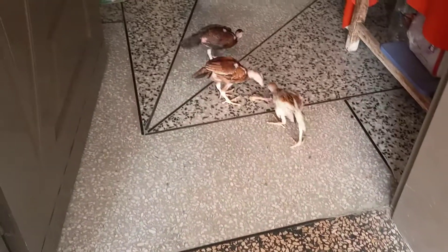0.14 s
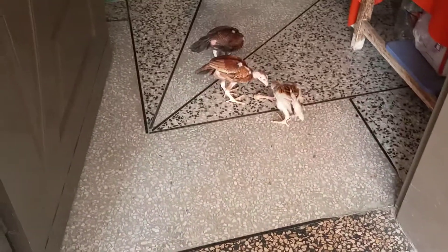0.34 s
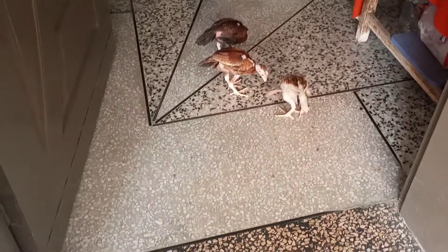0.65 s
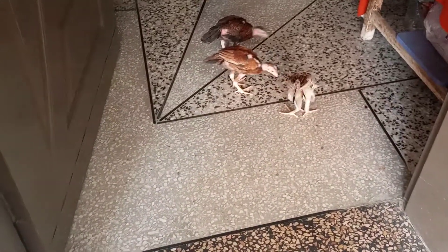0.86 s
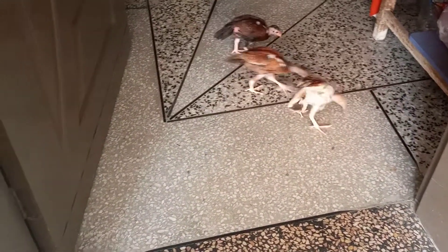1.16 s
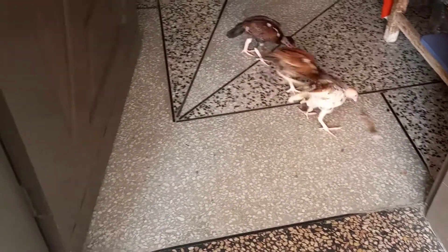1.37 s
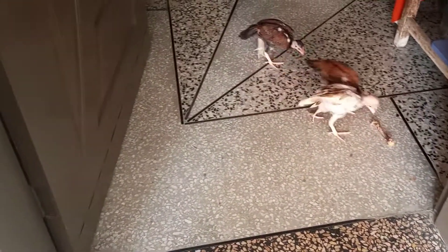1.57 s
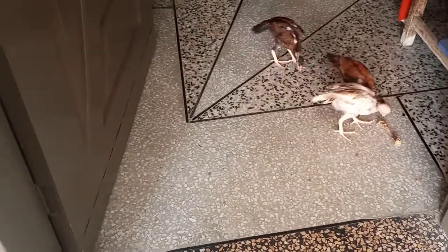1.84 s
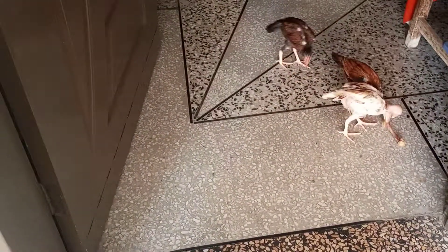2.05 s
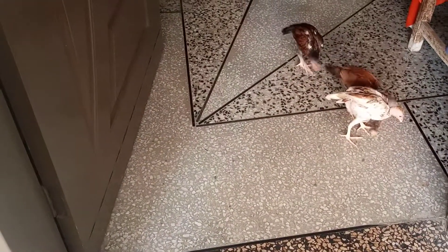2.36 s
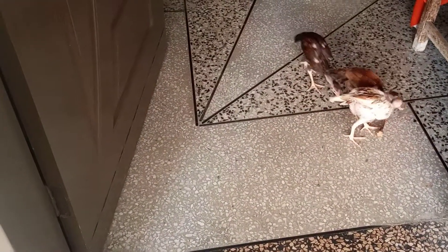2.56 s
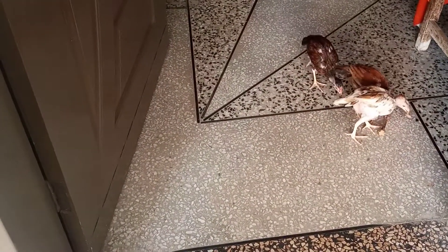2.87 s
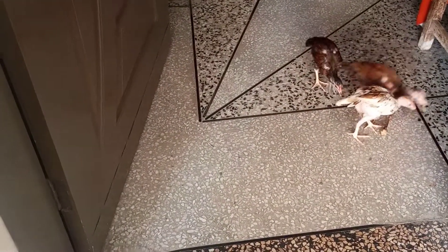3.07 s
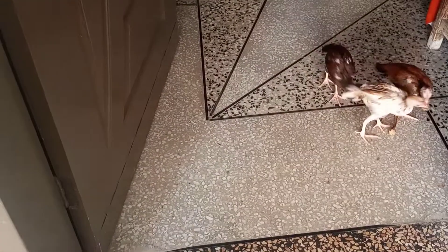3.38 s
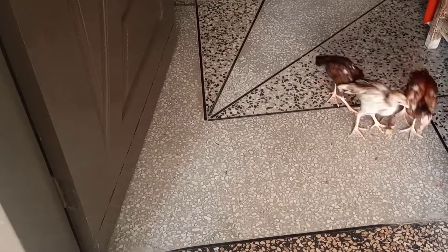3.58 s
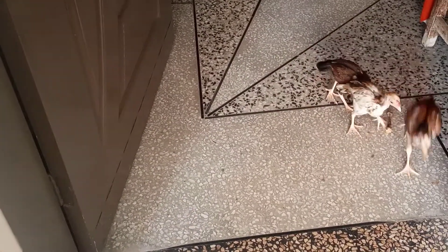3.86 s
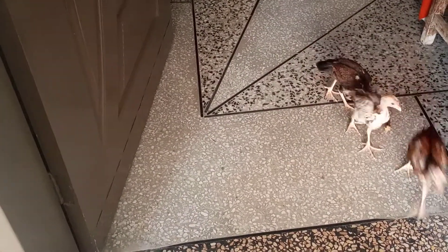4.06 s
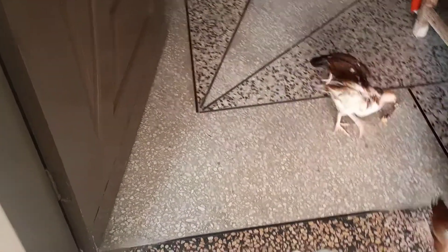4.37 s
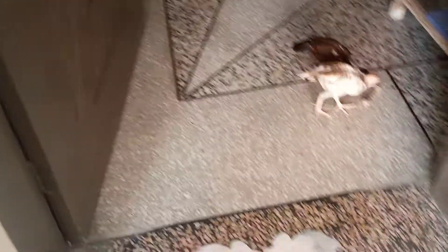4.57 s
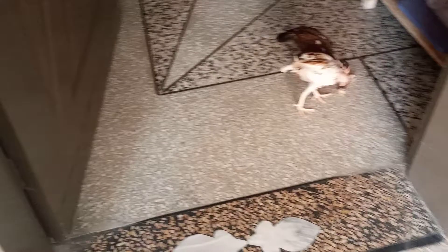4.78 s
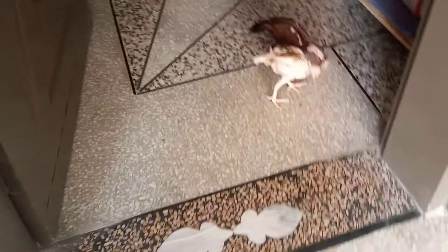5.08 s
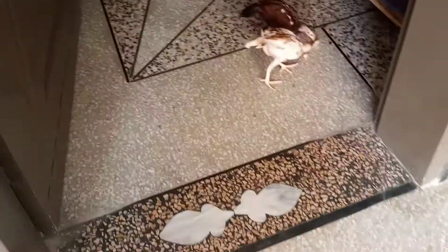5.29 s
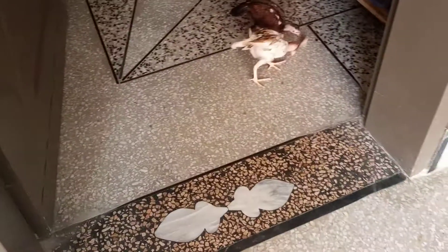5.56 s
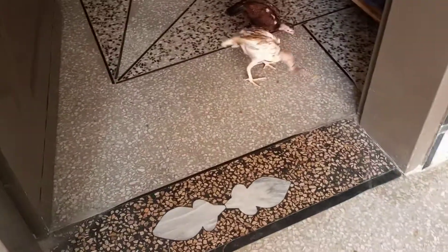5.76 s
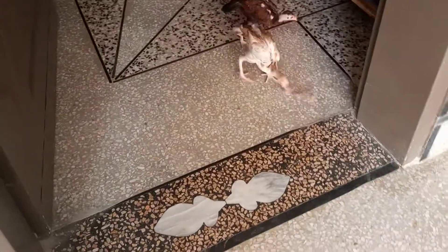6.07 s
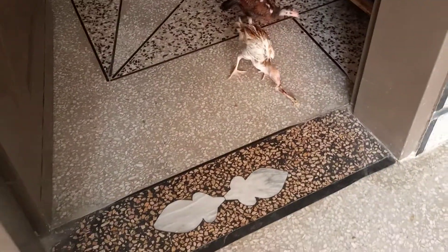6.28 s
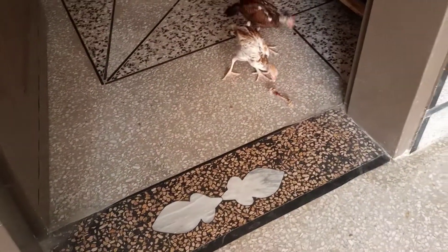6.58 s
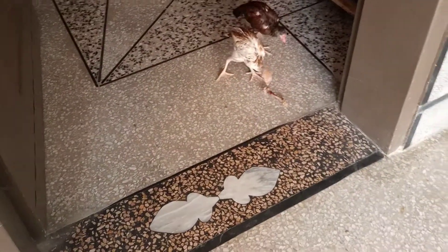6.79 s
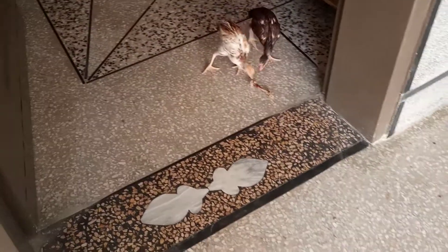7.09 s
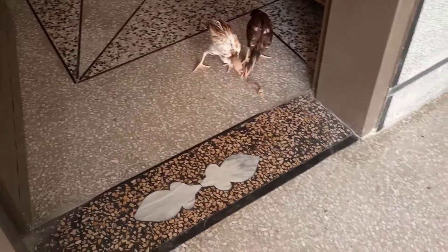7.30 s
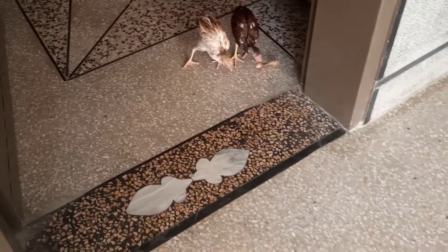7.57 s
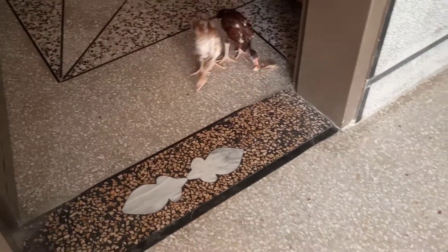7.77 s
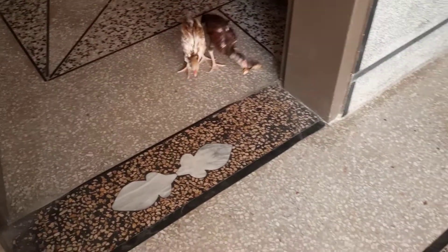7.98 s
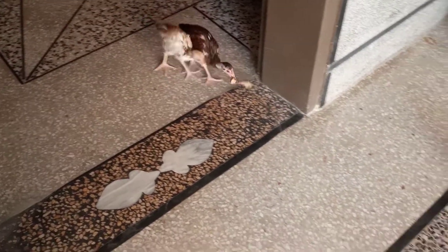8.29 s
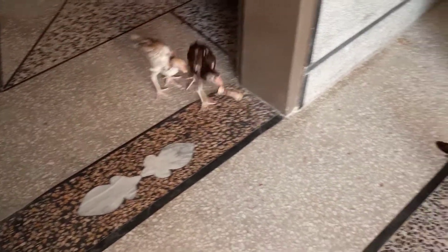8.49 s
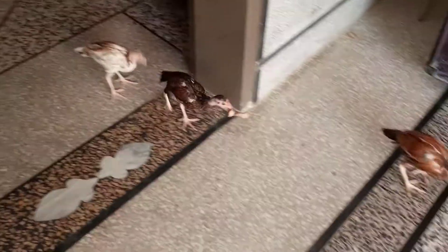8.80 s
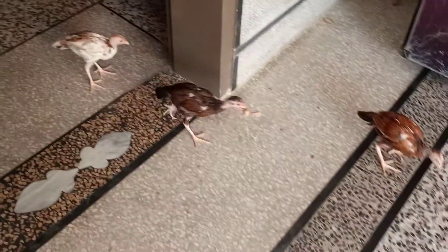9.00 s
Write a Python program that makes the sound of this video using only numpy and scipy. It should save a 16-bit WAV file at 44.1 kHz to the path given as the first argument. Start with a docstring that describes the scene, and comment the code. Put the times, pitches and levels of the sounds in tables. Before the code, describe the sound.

Three young chickens squabble indoors, thin whistled cheeps turning rough and loud near the end, with beak pecks and scuffs on hard stone.

```python
"""Three young chickens squabble over a scrap on the stone floor of a small, hard-walled hallway.
Each peep is an arched whistle from the two sides of the syrinx, which mix into sum and difference tones;
short cracks slide abruptly up or down in pitch, rough and rich in overtones. A thin squeak sounds once.
Beaks and claws tick, scuff and bump: shaped noise bursts. The hallway adds reflections and a diffuse tail.
Behind lie a low rumble, humming tones, dull air noise, a soft rush, dry rustles and a faint hiss."""
import sys
import numpy as np
from scipy import signal
from scipy.fft import rfft, irfft
from scipy.io import wavfile

SR = 44100
rng = np.random.default_rng(int(sys.argv[2]) if len(sys.argv) > 2 else 0)


def master_out(mix):
    """Clip the mix to full scale and print it as 16-bit PCM to the path in sys.argv[1]."""
    frames = np.transpose(np.atleast_2d(mix))
    ceiling = np.clip(frames, -1, 1)
    pcm = np.round(ceiling * 32767).astype(np.int16)
    wavfile.write(sys.argv[1], SR, pcm)


N = 403074
T = np.arange(N) / SR


def undb(db):
    """Decibels to gain."""
    return 10 ** (np.asarray(db) / 20)


def unit(x):
    """Scale to rms 1."""
    return x / np.sqrt(np.mean(x ** 2) + 1e-20)


def add(out, s, x):
    """Mix x in at time s."""
    i = max(int(s * SR), 0)
    out[i:i + len(x)] += x[:len(out) - i]


def colour(x, points):
    """Filter by a (frequency [Hz], gain [dB]) curve, falling 32 dB per octave beyond its ends."""
    hz, db = np.transpose(points)
    f = np.maximum(np.fft.rfftfreq(len(x), 1 / SR), 1)
    octaves_outside = np.abs(np.log2(f / np.clip(f, hz[0], hz[-1])))
    gain_db = np.interp(np.log(f), np.log(hz), db) - 32 * octaves_outside
    return irfft(rfft(x) * undb(gain_db), len(x))


def band(x, lo_hz, hi_hz):
    """Band-pass, kept below half the sample rate."""
    edges = [lo_hz, min(hi_hz, SR / 2 - 1)]
    return signal.sosfilt(signal.butter(2, edges, "band", fs=SR, output="sos"), x)


def walk(n, rate):
    """Random wander: straight lines between normal draws, rate draws a second."""
    place = np.arange(n) * rate / SR
    return np.interp(place, np.arange(n), rng.standard_normal(n))


def gate(t, length, rise, fall):
    """Smooth opening and closing."""
    opening = np.sin(np.pi / 2 * np.clip(t / rise, 0, 1)) ** 2
    closing = np.sin(np.pi / 2 * np.clip((length - t) / fall, 0, 1)) ** 2
    return opening * closing


def swell(s, length, attack, release, db):
    """Gain of a sound that rises at time s, holds and dies away."""
    return undb(db) * gate(T - s, length, attack, release)


def membrane(hz, waver, jitter):
    """Phase of a vibrating membrane: the pitch wavers slowly and jitters fast."""
    wander = waver * walk(len(hz), 107.0) + jitter * walk(len(hz), 1500)
    return 2 * np.pi * np.cumsum(hz * (1 + wander)) / SR


# colour of the turbulence at the valve of the syrinx: (frequency [Hz], relative gain [dB])
RASP_COLOUR = [(1700, -14.5), (3000, -7), (5000, 6.5), (6500, -6), (9000, 3), (12000, -1.5), (15500, -6)]


def turbulence(n):
    """Air hissing through the valve of the syrinx: coloured noise of rms 1."""
    return unit(colour(rng.standard_normal(n), RASP_COLOUR))


# a rough peep takes a moment to reach full strength: shortfall at roughness 1 [dB], time constant [s]
SOFT_START_DB, SOFT_START_S = 8, .012
# the second voice peaks later: its pitch ratio grows by this share over a call
SECOND_DRIFT = 0.0195
# the octave fades over a call [dB]; the third harmonic follows the octave: offset [dB], slope [dB per dB]
OCTAVE_FADE_DB, THIRD_DB, THIRD_SLOPE = 1, -13, 0.6
# bulge in mid-call [dB]; a swelling call saves its push for the end (power of time)
ARCH_DB, PUSH_POWER = 1.3, 3.1
# force brings out high overtones: reference level [dB], strength there [dB], growth [dB per dB]
FORCE_DB, SHRILL_DB, SHRILL_SLOPE = -41, -27.5, 0.21


def peep_pitch(u, first_hz, top_hz, last_hz, crest):
    """Arched pitch over the call's progress u: an early crest glides down, a late one holds, then drops."""
    rise = (first_hz - top_hz) * np.abs(1 - u / crest) ** 2.6
    fall = (last_hz - top_hz) * np.abs((u - crest) / (1 - crest)) ** (1.4 + 2.4 * crest)
    return top_hz + np.where(u < crest, rise, fall)


def peep(length, first_hz, top_hz, last_hz, crest, ratio, second_db, rough, db, swell_db, octave_db):
    """Two whistles arch together; the valve's nonlinearity adds their octaves, sum and difference tones."""
    t = np.arange(int((length + 0.009) * SR)) / SR
    u, n = t / length, len(t)
    hz = peep_pitch(u, first_hz, top_hz, last_hz, np.clip(crest, .05, .9))
    shake = np.clip(rough, .1, 1)
    waver, jitter = .003 + .005 * shake, .002 + .005 * shake
    # the valve also flutters, more in a rough call, which puts side tones beside each whistle
    flutter = .2 * shake * np.sin(membrane(hz * .15, waver=.15, jitter=.1))
    one = np.exp(1j * (membrane(hz, waver, jitter) + flutter))
    second_ratio = ratio * (1 + SECOND_DRIFT * (u - .5))
    two = np.exp(1j * (membrane(hz * second_ratio, waver, jitter) + flutter))
    # the second side sounds only while the pressure is high
    two = two * undb(second_db) * gate(u, 0.87, 0.08, 0.15)

    # groups of partials shimmer separately
    shimmer = [undb(shake * (3.2 * walk(n, 300) + 1.2 * walk(n, 35))) for _ in range(5)]
    tone = (one * shimmer[0] + two * shimmer[1]) / np.sqrt(1 + np.abs(two) ** 2)
    sums = 0.33 * one * two + .45 * two ** 2
    octave = unit((one ** 2 * shimmer[2] + sums * shimmer[3]).imag)
    octave = octave * undb(octave_db - OCTAVE_FADE_DB * (u - .5))
    upper = one ** 3 + 0.15 * one ** 2 * two + 0.66 * two ** 3 + 0.13 * one ** 4
    upper = unit(upper.imag * shimmer[4]) * undb(THIRD_DB + THIRD_SLOPE * octave_db)
    # the coupled sides also sound one and two gaps beyond the pair
    one_gap = (.07 + .15 * shake) * two ** 2 * one.conj()
    two_gaps = .08 * shake * two ** 3 * one.conj() ** 2
    difference = (one_gap + two_gaps).imag
    # turbulence is strongest when the call is bright
    rasp = shake * undb(-11 + octave_db / 2) * turbulence(n)

    push = u ** (PUSH_POWER if swell_db > 0 else 1)
    swelling_db = swell_db * (push - push.mean())
    bulge_db = ARCH_DB * (np.sin(np.pi * u) - .5)
    effort = undb(db + swelling_db + bulge_db + 0.93 * walk(n, 130))
    shrill = one ** 4 + one ** 3 * two + one * two ** 2 + one ** 5 / 2
    shrill = unit((shrill * shimmer[3]).imag) * undb(SHRILL_DB)
    shrill = shrill * (effort / undb(FORCE_DB)) ** SHRILL_SLOPE
    voice = unit(tone.imag) + octave + upper + shrill + difference + rasp
    soft_start = undb(-SOFT_START_DB * rough * np.exp(-t / SOFT_START_S))
    return voice * effort * gate(t, length + 0.0049, 0.0043, 0.0085) * soft_start


# fourth harmonic and breath noise of a crack, against its main tone [dB]
FOURTH_HARMONIC_DB, HARSH_DB = -12.5, -12.5


def squawk(length, from_hz, to_hz, db):
    """The pitch slips abruptly; the voice turns rough and rich, with a faint tone an octave below."""
    t = np.arange(int(length * SR)) / SR
    n = len(t)
    hz = to_hz + (from_hz - to_hz) * np.exp(-t / (.3 * length))
    phase = membrane(hz, waver=.025, jitter=.035)
    overtones = np.zeros(n)
    for k in range(2, 8):
        strength = undb(FOURTH_HARMONIC_DB - 5.6 * (k - 4.0))  # each harmonic is 5.6 dB below the last
        overtones += strength * np.sin(k * phase) * (1 + .5 * walk(n, 700))
    voice = np.sin(phase) * (1 + 0.44 * walk(n, 607)) + undb(-33) * np.sin(phase / 2)
    rasp = undb(HARSH_DB) * turbulence(n)
    return (voice + overtones + rasp) * undb(db) * gate(t, length, 0.0013, 0.0067)


# whistled calls, levels before the throat: (start [s], length [s], first pitch [Hz], top pitch [Hz],
#  last pitch [Hz], place of the top [0-1], second voice pitch ratio, second voice against first [dB],
#  roughness [0 smooth, about 1 rough], level [dB], swell from start to end [dB], octave against tone [dB])
PEEP_CALLS = [(0.348, .14, 2560, 2927, 2320, 0.22, 1.4, -18, .39, -60, -7, -14.5),
              (0.577, 0.11, 2630, 2943, 2390, 0.38, 1.7, -23, 0.3, -56, -6.5, -15),
              (.904, 0.079, 2460, 2715, 2280, 0.26, 1.3, -31, 0.4, -55.5, -9, -17),
              (1.074, .125, 3100, 3566, 3080, 0.49, 1.18, -3, .68, -56, 0, -13),
              (1.083, 0.09, 2536, 2787, 2435, 0.37, 1, -16, 0.3, -56.5, -16.5, -8),
              (1.399, .2, 2800, 3520, 1933, 0.46, 1.22, -3, .99, -57.5, 4.5, -6),
              (1.624, 0.066, 2506, 2817, 2360, 0.41, 1.3, -30, 0.47, -57, -6, -7.5),
              (1.81, 0.073, 2460, 3297, 2690, 0.58, 1.04, -.5, 1.05, -55.5, -8.5, -7.5),
              (1.969, 0.16, 3355, 3447, 2816, 0.46, 1.05, -1, 0.54, -59.5, -1, -15),
              (2.373, .2, 3040, 3580, 2148, 0.3, 1.21, -4, 0.97, -59, 2, -3),
              (2.701, 0.2, 3955, 3587, 2920, 0.43, .92, 3.5, 0.3, -58, -4, -14),
              (2.962, .15, 3320, 3634, 2353, 0.17, 1.086, 0, 0.5, -56, -15.5, -19),
              (3.021, 0.074, 2740, 2890, 2485, 0.24, 1.1, -32, .17, -60, 7, -2.5),
              (3.19, .12, 2560, 3328, 2560, 0.27, .85, 1, 0.82, -58.5, -4, -5),
              (3.394, 0.095, 2977, 3177, 2710, 0.43, 1.12, 2, 1, -56, -3, -11),
              (3.471, .15, 3400, 3556, 2913, .35, 1.15, -0.5, 1.1, -59, 12.5, -3),
              (3.826, 0.2, 2700, 3523, 2860, 0.24, 0.79, -9.5, 0.56, -52, -2.5, -11.5),
              (3.873, 0.13, 2620, 3070, 2880, 0.53, 1.5, -19, .63, -59, -13, -19),
              (3.993, .028, 2900, 2740, 2424, 0.28, 1.1, -26, 0.54, -41.5, 13, -21),
              (4.036, 0.043, 2944, 2950, 2550, .32, 1.6, -12, 1.1, -49.5, -11, -11),
              (4.135, .16, 2900, 3410, 2358, .31, 1.1, -14, 0.3, -56, 9.5, -6.5),
              (4.23, 0.15, 2990, 3552, 2407, .39, .98, -1, 0.73, -48.5, 3, -14),
              (4.537, .19, 2946, 3638, 2503, 0.33, 1.13, -16, 0.68, -48, -0.5, -15.5),
              (5.012, 0.17, 2910, 3608, 2625, 0.4, 0.9, -9, 0.92, -52, -3, -12.5),
              (6.06, 0.24, 3458, 3403, 2098, 0.4, 1.15, -6.5, 1.18, -52.5, 3, -8),
              (6.371, .13, 3200, 3453, 2730, 0.35, 1.12, -1.5, 1, -51, 12, -7.5),
              (6.741, .26, 3950, 3606, 3220, 0.53, 0.91, 1.5, 0.68, -60, 0.5, -18.5),
              (7.795, .21, 3216, 3544, 2880, 0.52, 1.225, 2.5, 1.23, -45.5, 9, -4),
              (8.144, .17, 3246, 3553, 2856, .54, 1.18, 0, 0.86, -39.5, 14.5, -6),
              (8.465, .15, 2900, 3514, 2935, 0.54, 1.194, 0.5, 0.44, -38, 9.5, -5.5),
              (8.845, 0.2, 2856, 3514, 2690, 0.59, 1.157, 0, 0.6, -39.5, 10.5, -3.5)]
# the voice cracks, up into a peep or down out of it, level before the throat:
# (start [s], length [s], from pitch [Hz], toward pitch [Hz], main tone level [dB])
VOICE_CRACKS = [(1.393, 0.03, 1750, 2233, -63.5), (2.544, 0.0244, 2690, 2153, -58),
                (3.432, 0.028, 1630, 2360, -60.5), (3.621, 0.022, 2920, 1580, -58.5),
                (6.273, 0.026, 2590, 1963, -50.5), (6.5, .017, 2940, 1472, -45.5),
                (8.006, 0.029, 2790, 1450, -41), (8.31, .045, 2840, 1514, -39),
                (8.453, 0.02, 1930, 2470, -51), (8.609, .036, 2900, 1529, -35.5),
                (9.036, 0.044, 2400, 1402, -35.5)]
# what throat and beak let through: (frequency [Hz], gain [dB])
THROAT_COLOUR = [(700, -1.5), (1400, -2.5), (3200, -0.5), (4200, 0.5), (4750, -4.5), (5300, -2), (6000, 0),
                 (7100, 0), (8500, -0.5), (10500, -3), (12500, -12.5), (16000, -4)]


def chickens():
    """All calls, shaped by the resonances of throat and beak."""
    out = np.zeros(N)
    for s, *call in PEEP_CALLS:
        add(out, s, peep(*call))
    for s, *crack in VOICE_CRACKS:
        add(out, s, squawk(*crack))
    return undb(-.5) * colour(out, THROAT_COLOUR)


# a faint thin squeak: (start [s], length [s])
SQUEAK_TIME = (7.07, 0.14)
# its tones: (frequency [Hz], peak level [dB])
SQUEAK_PARTIALS = [(4420, -68), (5570, -61), (10100, -81)]


def squeak():
    """A few high tones, briefly, each wavering slightly around a fixed pitch."""
    out, (s, length) = np.zeros(N), SQUEAK_TIME
    t = np.arange(int(length * SR)) / SR
    for hz, db in SQUEAK_PARTIALS:
        tone = np.sin(membrane(np.full(len(t), hz), waver=0.012, jitter=0.016))
        add(out, s, undb(db) * tone * gate(t, length, .025, 0.067))
    return out


FLOOR_T = np.arange(SR // 4) / SR  # each floor sound lasts at most a quarter second

# beaks and claws on stone: (time [s], level before a 4 dB cut [dB],
#  low knock before a 3 dB ceiling and a 3.5 dB cut [dB], top before a 12 dB lift [dB])
PECK_HITS = [(.2515, -55, -39, -10), (.704, -43.5, -11, -33), (.8056, -53, -13, -8), (1.0451, -47, -2, -14),
             (1.9592, -60.5, -10.5, -13), (2.151, -61, -49, -13), (3.317, -70.5, 2, -4),
             (3.6494, -59, 2.5, -9), (4.385, -58, -10, -20), (4.984, -48.5, -26, -22),
             (5.7698, -55, -10, -11), (6.024, -50, -32, -4.5), (6.5886, -49.5, -20, -10),
             (6.6293, -51, -22, -32), (7.2842, -52, -25, -16), (7.743, -64, -32, -23),
             (7.7794, -50.5, -46, -17)]
# colour of the tick: (frequency [Hz], relative gain [dB])
TICK_COLOUR = [(1200, -19), (3000, -19), (6000, 9), (9000, 1.5), (12000, -17), (16000, -17)]


def pecks():
    """A hard tip on stone: a bright tick dies in milliseconds over a lower, longer knock."""
    out, t = np.zeros(N), FLOOR_T
    for s, db, knock_db, top_db in PECK_HITS:
        noise = rng.standard_normal(len(t))
        tick = unit(colour(noise, TICK_COLOUR)) + undb(top_db + 12) * unit(band(noise, 7000, 24000))
        tick = tick * np.minimum(t / .001, 1) * np.exp(-t / 0.0038)  # rise and decay [s]
        knock = undb(min(knock_db, 3) - 3.5) * unit(band(noise, 600, 2440))
        add(out, s, undb(db - 4.0) * (tick + knock * np.exp(-t / 0.019)))
    return out


# dull scuffs: (start [s], length, at most 0.25 heard [s], pitch region [Hz], level before a 3.5 dB cut [dB])
SCUFF_STROKES = [(0.414, 0.16, 447, -74), (0.683, 0.14, 533, -62), (.45, 0.34, 235, -76),
                 (0.934, 0.11, 460, -69), (1.112, 0.12, 1230, -60), (2.566, 0.22, 632, -63.5),
                 (3.623, 0.15, 524, -66), (3.861, 0.18, 492, -64.5), (4.019, 0.25, 456, -67),
                 (5.193, 0.091, 388, -55.5), (9.072, 0.094, 497, -49)]


def scuffs():
    """Claws dragging on stone: narrow bands of noise that swell and fade."""
    out, t = np.zeros(N), FLOOR_T
    for s, length, hz, db in SCUFF_STROKES:
        noise = unit(band(rng.standard_normal(len(t)), hz * 0.73, hz * 1.23))
        add(out, s, undb(db - 3.5) * noise * gate(t, length, 0.015, 0.12))
    return out


# soft bumps: (time [s], level [dB])
BUMP_HITS = [(.578, -59.5), (0.708, -54.5), (1.19, -58), (1.471, -64), (5.218, -48)]


def bumps():
    """Soft low thuds: bass noise with a quick decay."""
    out, t = np.zeros(N), FLOOR_T
    for s, db in BUMP_HITS:
        add(out, s, undb(db) * unit(band(rng.standard_normal(len(t)), 65, 150)) * np.exp(-t / .018))
    return out


# how long the hallway rings: (frequency [Hz], time to fall 60 dB [s])
HALL_DECAY = [(200, 0.17), (1500, 0.62), (3300, 0.48), (7000, 0.37), (14000, 0.23)]
# first reflections from floor and near walls: (delay [s], gain against the direct sound)
FIRST_REFLECTIONS = [(.0023, 0.052), (.0061, 0.14), (0.0108, .2)]


def hallway(x, wet_db):
    """Floor and near walls reflect at once; a diffuse noise tail decays at its own rate in each band."""
    t = np.arange(SR * 3 // 4) / SR
    hz, t60 = np.transpose(HALL_DECAY)
    spectrum, f = rfft(rng.standard_normal(len(t))), np.fft.rfftfreq(len(t), 1 / SR)
    tail = np.zeros(len(t))
    for share, decay in zip(np.eye(len(hz)), t60):
        band_noise = irfft(spectrum * np.interp(f, hz, share), len(t))
        tail += band_noise * np.exp(-np.log(1000) * t / decay)
    tail = tail * np.clip(t / 0.002, 0, 1)
    response = undb(wet_db) * tail / np.sqrt(np.sum(tail ** 2))
    response[0] += 1  # direct sound
    for delay, gain in FIRST_REFLECTIONS:
        response[int(delay * SR)] += gain
    return signal.fftconvolve(x, response)[:N]


# low hums that swell and fade while their pitch slides, level before a shared random wander:
# (start [s], length [s], attack [s], first pitch [Hz], last pitch [Hz], level [dB])
HUM_SWELLS = [(4.4, 0.84, 0.64, 202.8, 188.7, -67), (5.375, 1.7, 1.08, 95, 91.6, -58),
              (6.887, 0.36, 0.31, 91, 84, -61.5), (7.29, 1.87, 0.76, 170, 180, -69.5),
              (8.454, 1.7, 0.56, 76.4, 74, -58.5)]


def hums():
    """Low wavering tones, one swell each."""
    out = np.zeros(N)
    for s, length, attack, first_hz, last_hz, db in HUM_SWELLS:
        hz = np.interp(T, [s, s + length], [first_hz, last_hz])
        tone = np.sin(membrane(hz, waver=0.029, jitter=0.015))
        out += tone * swell(s, length, attack, max(length - attack, .01), db)
    return out * undb(3.9 * walk(N, 8.4))


# colour of the low rumble: (frequency [Hz], relative gain [dB])
RUMBLE_COLOUR = [(21, -48), (35, -24), (59, -10.5), (78, -7), (92, -4.5), (162, -1.5), (220, -25.5),
                 (281, -23.5), (330, -15), (430, -32.5), (730, -120)]
# its level before a 1.5 dB lift and a random wander: (time [s], level [dB])
RUMBLE_COURSE = [(0.0, -86), (0.73, -82.5), (0.99, -89.5), (1.83, -90.5), (5.55, -67), (6.64, -65.5),
                 (6.82, -74), (7.94, -69.5), (8.02, -66), (9.01, -67), (9.14, -58)]


def rumble():
    """Low noise whose level drifts along its course and wavers."""
    level_db = np.interp(T, *np.transpose(RUMBLE_COURSE)) + 1.5
    return unit(colour(rng.standard_normal(N), RUMBLE_COLOUR)) * undb(level_db + 2.5 * walk(N, 14))


# colour of the dull air noise: (frequency [Hz], relative gain [dB])
AIR_COLOUR = [(200, 4.5), (330, -8), (500, -0.5), (750, -11), (1100, -10.5), (1800, -8), (3000, -31)]
# its level before a random wander: (time [s], level [dB])
AIR_COURSE = [(0.0, -88), (0.99, -76), (1.6, -88), (3.56, -83.5), (4.0, -72), (4.81, -79.5), (5.24, -66.5),
              (6.59, -72.5), (7.13, -81.5), (7.61, -86), (8.47, -81.5), (9.14, -85)]


def air():
    """Dull noise that drifts along its course and wavers."""
    level_db = np.interp(T, *np.transpose(AIR_COURSE))
    return unit(colour(rng.standard_normal(N), AIR_COLOUR)) * undb(level_db + 2.4 * walk(N, 8))


# a soft rush swells and fades: (start [s], length [s], attack [s], release [s], level [dB])
RUSH_SWELL = (4.5, 2.5, 1.6, 0.3, -68.5)
# its colour: (frequency [Hz], relative gain [dB])
RUSH_TINT = [(590, -52), (1000, -13), (2470, 0), (3270, -9), (3590, -10), (4240, -14.5), (5920, -1.5),
             (12000, -34), (15600, -63), (22000, -120)]


def rush():
    """Coloured noise under one slow swell."""
    return unit(colour(rng.standard_normal(N), RUSH_TINT)) * swell(*RUSH_SWELL)


# dry rustles, level before a random wander: (start [s], length [s], attack [s], release [s], level [dB])
RUSTLE_SWELLS = [(0, 0.2, 0.0013, 0.24, -61.5), (0.227, 0.66, 0.057, 0.11, -64.5),
                 (0.576, 0.86, 0.068, 0.37, -61.5), (7.498, 0.18, 0.087, 0.095, -72)]
# colour of rustles and hiss: (frequency [Hz], relative gain [dB])
HISS_COLOUR = [(1000, -13.5), (2500, -7), (4300, -6.5), (6200, 4.5), (9000, -5), (12500, -16.5),
               (15500, -2.5)]


def rustles():
    """Dry noise swells over a faint constant hiss, their powers added; the whole flickers."""
    hiss_power = undb(-78) ** 2
    level = np.sqrt(hiss_power + sum(swell(*row) ** 2 for row in RUSTLE_SWELLS))
    return unit(colour(rng.standard_normal(N), HISS_COLOUR)) * level * undb(2.0 * walk(N, 90))


def background():
    """Everything behind the birds, without the hallway's reverberation."""
    return hums() + rumble() + air() + rush() + rustles()


def scene():
    """Birds and floor sounds ring in the hallway, over the background."""
    floor_sounds = pecks() + scuffs() + bumps()
    return (hallway(chickens() + squeak() + floor_sounds, wet_db=-3.0) + background())[None]


def record(dry):
    """A steep low-pass: nothing sounds above about 15.8 kHz."""
    return signal.sosfilt(signal.ellip(10, .2, 80, 15800, fs=SR, output="sos"), dry)


dry = scene()
out = record(dry)
master_out(out)
```